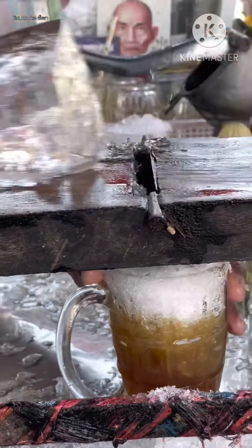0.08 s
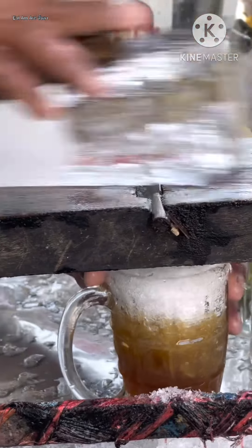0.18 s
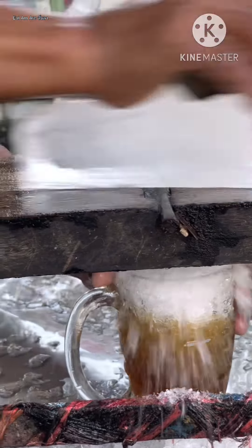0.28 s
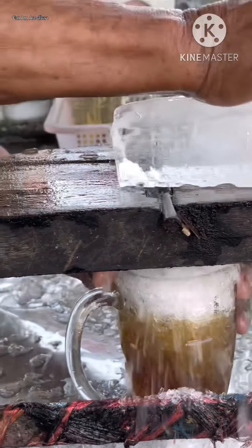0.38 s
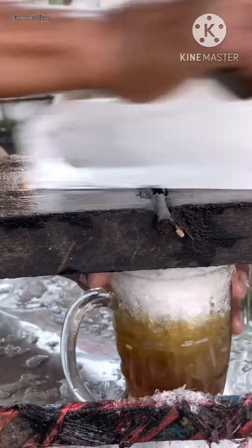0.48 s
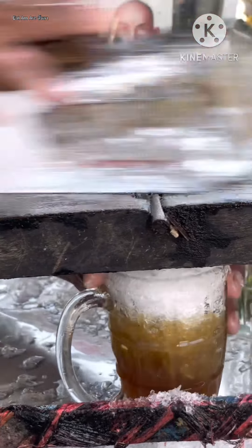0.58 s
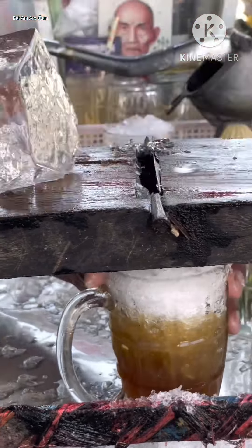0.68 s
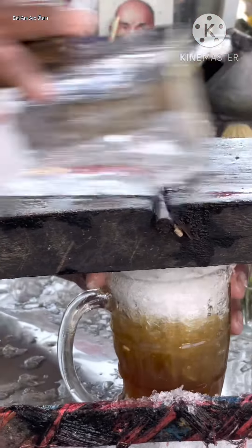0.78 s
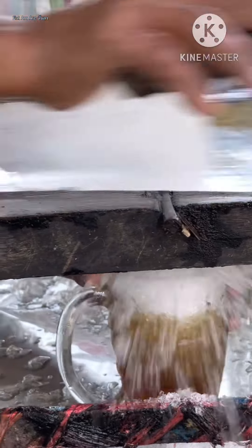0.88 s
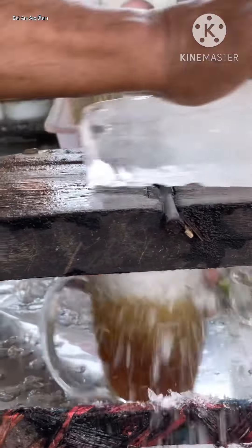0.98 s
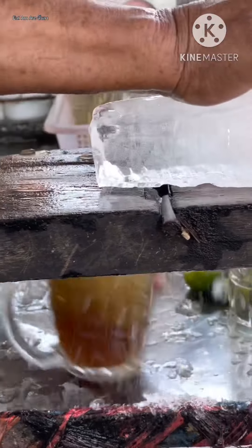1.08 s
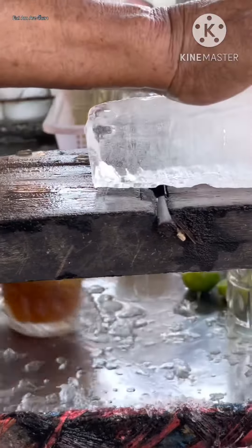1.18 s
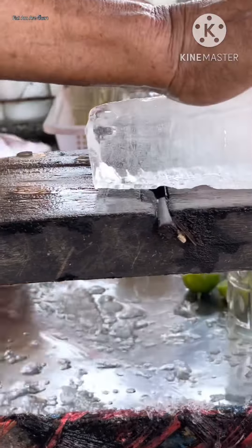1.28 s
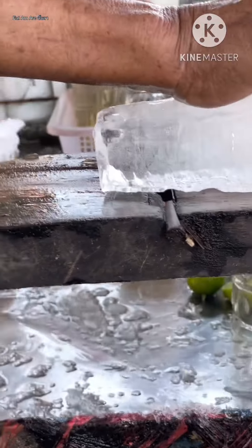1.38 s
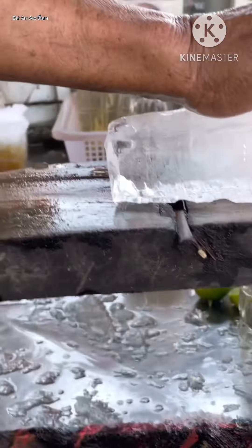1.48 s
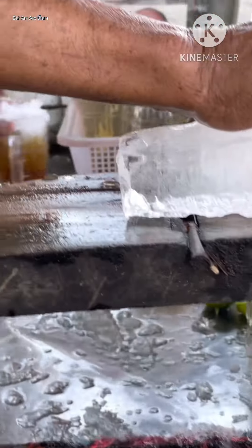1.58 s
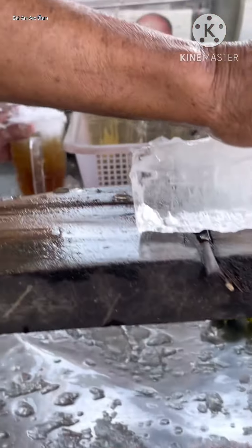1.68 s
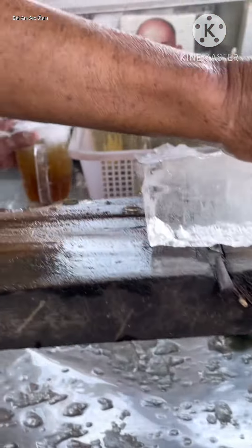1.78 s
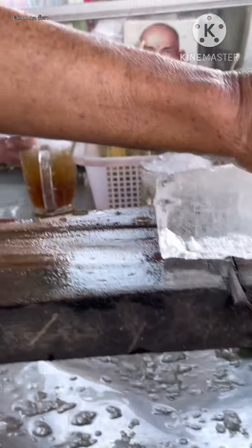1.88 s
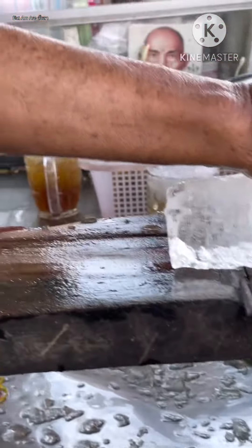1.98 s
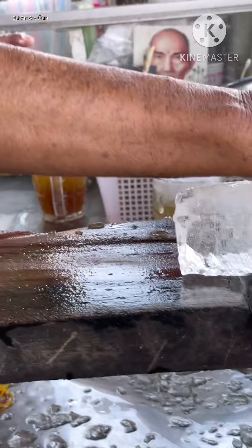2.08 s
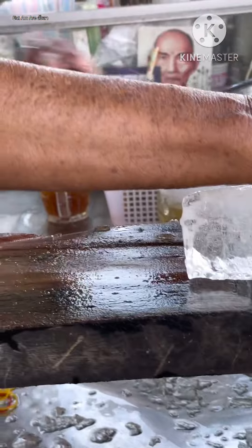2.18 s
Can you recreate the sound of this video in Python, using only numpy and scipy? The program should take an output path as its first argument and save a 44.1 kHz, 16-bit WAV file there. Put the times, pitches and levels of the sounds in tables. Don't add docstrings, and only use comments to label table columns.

```python
import sys
import numpy as np
from scipy import signal
from scipy.fft import rfft, irfft
from scipy.io import wavfile
from scipy.ndimage import uniform_filter1d

SR = 44100
rng = np.random.default_rng(int(sys.argv[2]) if len(sys.argv) > 2 else 0)


def to_linear_factor(level_db):
    exponent = np.asarray(level_db, float) / 20
    return 10 ** exponent


def int16_out(signal):
    q = np.round(np.clip(np.atleast_2d(signal).T, -1, 1) * 32767)
    wavfile.write(sys.argv[1], SR, q.astype(np.int16))


N = 97020
T = np.arange(N) / SR


def level(x, db=0):
    return x * to_linear_factor(db) / np.sqrt(np.mean(x ** 2))


def colour(x, points):
    hz, db = np.array(points).T
    f = np.maximum(np.fft.rfftfreq(N, 1 / SR), 1)
    return irfft(rfft(x) * to_linear_factor(np.interp(np.log(f), np.log(hz), db)), N)


def ring(x, hz, width_hz):
    b, a = signal.iirpeak(min(hz, .45 * SR), hz / width_hz, SR)
    return signal.lfilter(b, a, x)


def walk(rate):
    hold = int(SR / rate)
    steps = np.repeat(rng.standard_normal(N // 40), hold)[:N]
    return level(uniform_filter1d(steps, hold))


def curve(rows, col=1):
    rows = np.array(rows)
    return to_linear_factor(np.interp(T, rows[:, 0], rows[:, col], -120, -120))


def grains(rate, spread_db):
    chance, side, size = rng.random((3, N))
    sign = np.sign(side - .5)
    return (chance < rate / SR) * sign * to_linear_factor(-spread_db * np.log(size + 1e-3))


def echo(x, t60, db):
    fade = np.exp(-np.log(1000) * T[:16000] / t60)
    tail = level(rng.standard_normal(16000) * fade) / np.sqrt(16000)
    return x + to_linear_factor(db) * signal.fftconvolve(x, tail)[:N]


def hits(table, width, crack_db, gain_db, crack_hz):
    strike_share = 0.75
    out, t = np.zeros(N + 8000), np.arange(8000) / SR
    noises = rng.standard_normal((len(table), 8000))
    for (s, db, hz, t60), noise in zip(table, noises):
        fade = np.exp(-np.log(1000) * t / max(t60, .005))
        strike = strike_share + np.exp(-t / 0.0012)
        burst = noise * fade * strike * np.minimum(t / 0.0009, 1)
        width_hz = 1.93 * hz * width
        tone = ring(ring(burst, hz, width_hz), hz, width_hz)
        crack = ring(burst, crack_hz, 2.5 * crack_hz)
        hit = tone / abs(tone).max() + to_linear_factor(crack_db) * crack / abs(crack).max()
        i = int(s * SR)
        out[i:i + 8000] += to_linear_factor(db + gain_db) * hit
    return out[:N]


# (f/Hz, level/dB)
ICE_COLOUR = [(200, -6.5), (900, -7), (2500, -4), (7000, -1), (10000, 3), (12500, -5), (14800, 6),
              (16000, -9)]


def icy(x):
    return colour(x, ICE_COLOUR)


# (f/Hz, width/Hz, level/dB)
BOARD_MODES = [(513, 100, 2), (1000, 110, 4), (1437, 150, 5), (2320, 350, -4.5), (2900, 620, 1),
               (4300, 180, 2.5), (5900, 720, 1), (7220, 610, 1)]


def board(x, patchy_db=0):
    return x + sum(to_linear_factor(db + patchy_db * walk(54.0)) * ring(x, hz, w) for hz, w, db in BOARD_MODES)


# (t/s, level/dB)
STROKES = [
    [(0.241, -33.5), (0.247, -22.5), (0.277, -21.5), (.3, -23), (.33, -24), (.39, -22.5), (0.471, -31),
     (0.495, -60), (0.51, -60)],
    [(0.871, -26), (.897, -25), (0.921, -20.5), (.941, -28.5), (.98, -26), (1.037, -31), (1.07, -37.5),
     (1.125, -51), (1.145, -74)],
]
# (t/s, boost/dB)
BITES = [(0.246, 4.5), (.26, 6), (.267, 4.5), (0.275, 4), (0.281, 6.5), (.291, 7), (0.31, 10.5),
         (0.315, 1.5), (0.322, 3), (.336, 2.5), (0.351, -5.5), (.378, -1), (0.383, -2), (.417, 5.5),
         (.437, 3), (0.471, 2.5), (.872, 11), (.885, 6.5), (.889, 6), (0.895, 5), (.901, 7), (0.913, 3),
         (0.929, 11), (.948, 13), (0.962, 7.5), (0.97, 3.5), (0.98, 9.5), (.982, 1), (.988, 3), (1.003, 6),
         (1.012, 4.5), (1.028, 6), (1.036, 8.5), (1.051, 14), (1.064, 5.5), (1.073, 3.5), (1.099, 7),
         (1.117, 8)]
# (t/s, f/Hz, half length/s, level/dB)
FLARES = [(0.278, 6250, 0.012, 0.5), (0.302, 2740, 0.033, 0.5), (0.334, 1630, 0.039, 8.5),
          (0.383, 5900, 0.014, 5.5), (0.407, 2050, 0.063, 5), (0.896, 4300, 0.014, 6.5),
          (0.899, 6900, 0.012, 7), (0.909, 3100, 0.0042, 2), (0.991, 1390, 0.023, 8),
          (0.973, 4500, 0.011, 9), (1.042, 3170, 0.06, 8.5), (1.118, 3000, .014, 12)]


def cutting():
    chips_per_s, chip_spread_db = 16000, 2.2
    judder_hz, judder_db = 160, 1.
    bite_s, slip_s = 0.0018, 0.004
    digs = 0
    for s, db in BITES:
        pace_s = np.where(T < s + bite_s, bite_s, slip_s)
        digs = digs + db * np.exp(-abs(T - s - bite_s) / pace_s)
    bite = to_linear_factor(judder_db * walk(judder_hz) + digs)
    ice = icy(grains(chips_per_s, chip_spread_db))
    flares = 0
    for s, hz, half_s, db in FLARES:
        swell = np.exp(-((T - s) / half_s) ** 2)
        flares = flares + to_linear_factor(db + 1.5) * swell * ring(ice, hz, hz * .14)
    chips = level(board(ice, patchy_db=0.5) + flares, 1.1)
    return chips * bite * sum(curve(c) for c in STROKES)


# (t/s, level/dB, dullness/dB)
DRAGS = [
    [(0.0, -37, -5), (.018, -68, 13.5), (.026, -37.5, -7), (.055, -41, -9), (0.08, -35.5, -15),
     (0.11, -51.5, 2), (0.128, -36, -10), (.155, -58.5, 9.5), (0.2, -92, -5)],
    [(0.54, -60, -14), (.575, -58, -12), (0.61, -59.5, 13), (0.66, -76.5, 23), (.7, -49, -1.5),
     (0.73, -34, -15.5), (0.746, -57, 15), (.765, -74, 7), (0.79, -94, -3)],
    [(1.29, -88, -6), (1.306, -72, -21), (1.33, -52, -14), (1.354, -51, 9.5), (1.38, -68.5, 4),
     (1.4, -62, 14), (1.44, -84, -7), (1.465, -67, 7), (1.5, -72, -19)],
]


def dragging():
    grit = grains(16000, 0.67) * to_linear_factor(0.68 * walk(110))
    hiss = level(board(icy(grit), patchy_db=4), 1.5)
    rub = level(ring(board(grit), 800, 1000), .1)
    return sum(curve(d) * (hiss + curve(d, 2) * rub) for d in DRAGS)


# (t/s, level/dB)
CRUMBS = [(0.0, -70), (.17, -82), (0.23, -42), (.5, -46.5), (.68, -60), (.78, -95), (.85, -49.5),
          (1.14, -49.5), (1.23, -51.5), (1.285, -74), (1.35, -56), (1.55, -56.5), (1.72, -64), (1.89, -80),
          (2.2, -71)]


def crumbs():
    patter = grains(9000, 2.5) * to_linear_factor(1.8 * walk(40))
    dulling = to_linear_factor(np.interp(T, [1.5, 1.9], [-3, -16]))
    sparkle = level(ring(patter, 21000, 4000)) * dulling
    rattle = level(ring(patter, 5900, 7000))
    thud = level(ring(patter, 1200, 1500), 1.0)
    return (rattle + sparkle + thud) * to_linear_factor(-9.5) * curve(CRUMBS)


# (t/s, peak level/dB, f/Hz, ring/s)
KNOCKS = [(0.025, -28.5, 1400, 0.07), (0.127, -30.5, 2400, 0.14), (.134, -35, 560, .08),
          (0.572, -40.5, 1690, 0.091), (.62, -32, 1855, .05), (.58, -35.5, 940, .05),
          (0.599, -34, 1500, 0.05), (.612, -34, 1100, .08), (.641, -38, 1350, .08), (1.168, -34, 558, .06),
          (.712, -33.5, 970, .05), (0.729, -28, 1500, 0.06), (.738, -37, 480, 0.1),
          (.75, -37.5, 410, 0.059), (.873, -20, 1200, .03), (1.089, -34.5, 1330, 0.08),
          (1.166, -30, 1350, 0.06), (1.197, -48, 942, 0.051), (1.241, -47.5, 1500, .03),
          (1.324, -31, 1170, 0.04), (1.334, -35, 2500, .04), (1.338, -37, 1340, 0.03),
          (1.352, -34.5, 1000, 0.04), (1.396, -39.5, 1100, 0.04), (1.402, -36.5, 1200, .03),
          (1.414, -39.5, 2600, 0.05), (1.459, -46.5, 2440, 0.08), (1.467, -45.5, 2600, .05),
          (1.637, -33.5, 1150, 0.09)]


def knocks():
    body_hz, body_width_hz, body_db = 570, 420, -13.5
    blows = hits(KNOCKS, 0.36, -27.5, .1, 2200)
    body = level(ring(ring(blows, body_hz, body_width_hz), body_hz, body_width_hz))
    return blows + to_linear_factor(body_db) * body * np.std(blows)


# (t/s, peak level/dB, f/Hz, ring/s)
TICKS = [(0.1885, -45, 12000, 0.0087), (0.611, -26, 14900, 0.019), (0.635, -41, 7000, 0.04),
         (0.6833, -28, 6300, 0.031), (0.6944, -43.5, 5600, 0.012), (0.7986, -47, 15600, 0.02),
         (0.8365, -43, 14600, 0.031), (1.1518, -36, 15000, 0.039), (1.268, -42, 14500, 0.0088),
         (1.3084, -30, 14100, 0.016), (1.4531, -30.5, 14000, 0.025), (1.4835, -39, 14400, 0.028),
         (1.5529, -40.5, 15200, 0.051), (1.5664, -41.5, 13850, 0.038), (1.6661, -48.5, 14100, 0.022),
         (1.8113, -54, 15520, 0.012), (1.957, -49.5, 6300, 0.025), (2.1914, -49, 15700, 0.033)]


def ticks():
    return hits(TICKS, 0.54, -9.5, .1, 9000)


# (t/s, peak level/dB, f/Hz, ring/s)
DRIPS = [(.637, -37.5, 6000, 0.051), (.683, -36, 5800, .04), (.712, -35, 5900, 0.1),
         (1.098, -33.5, 3180, 0.031), (1.27, -45.5, 2550, 0.04), (1.3079, -38.5, 2200, 0.07),
         (1.3558, -35.5, 2100, 0.021), (1.3965, -40, 2194, 0.077), (1.7599, -67, 2265, 0.057),
         (1.7848, -51.5, 2410, 0.043), (1.92, -49.5, 2270, 0.04), (2.1116, -46.5, 2240, 0.076)]


def drips():
    return hits(DRIPS, 0.17, -5.5, 0.085, 3400)


def squeak():
    middle_hz, rise_hz_per_s = 5900, 37000
    t = T - 1.735
    tone = np.sin(2 * np.pi * (middle_hz * t + rise_hz_per_s * t ** 2 / 2))
    return to_linear_factor(-66 + 3 * walk(400)) * tone * np.exp(-(t / .016) ** 2)


# (t/s, level/dB)
ENGINE_LEVEL = [(0, -48), (.15, -45.5), (.3, -49), (.45, -44.5), (.55, -40.5), (.63, -47.5), (.75, -39.5),
                (.9, -40.5), (1.05, -39), (1.2, -41), (1.3, -42.5), (1.45, -39), (1.6, -39), (1.75, -39),
                (1.9, -38.5), (2.05, -37), (2.2, -33)]
# (f/Hz, width/Hz, level/dB)
EXHAUST = [(169.5, 66, -0.5), (156.64, 27, -7.5), (317, 59, -15.5), (463, 52, -25.5)]
# (t/s, firings so far)
FIRINGS = [(-.014, 0), (.429, 11), (.859, 22), (1.089, 28), (1.47, 38), (1.846, 48), (2.177, 57),
           (2.25, 59)]


def engine():
    lag_s, jitter_s, uneven_db = .012, .0003, 1.
    echo_t60_s, far_wet_db, near_wet_db = .25, -7, -20
    s, count = np.array(FIRINGS).T
    chance = rng.standard_normal((60, 2))
    at = np.interp(np.arange(60), count, s) - lag_s + jitter_s * chance[:, 0]
    pulses = np.zeros(N + SR)
    pulses[np.clip(at * SR, 0, None).astype(int)] = to_linear_factor(uneven_db * chance[:, 1])
    pipe = 0
    for hz, w, db in EXHAUST:
        pipe = pipe + to_linear_factor(db) * level(ring(ring(ring(pulses[:N], hz, w), hz, w), hz, w))
    wet = to_linear_factor(np.interp(T, [0, T[-1]], [far_wet_db, near_wet_db]))
    tail = echo(pipe, echo_t60_s, 0) - pipe
    return level(pipe + wet * tail) * curve(ENGINE_LEVEL)


# (t/s, level/dB)
SHAKE = [(0, -49.5), (.5, -46), (.9, -49), (1.1, -48), (2.2, -62.5)]


def shake():
    push = np.diff(rng.standard_normal(N), prepend=0)
    rumble = ring(ring(push, 43, 70), 65, 110)
    return level(rumble * to_linear_factor(1.2 * walk(25))) * curve(SHAKE)


# (f/Hz, level/dB)
STREET = [(30, -33.5), (60, -7.5), (120, -0.5), (300, 1), (600, -20.5), (1000, -30.5), (3000, -36),
          (16000, -79.5)]


def street():
    return level(colour(rng.standard_normal(N), STREET) * to_linear_factor(1.2 * walk(6)), -49)


# (start t/s, end t/s)
KEPT = [(.11, .15), (.24, .256), (.68, .69), (.868, .88), (.92, .96), (1.04, 1.08), (1.305, 1.32),
        (1.45, 1.5), (1.63, 1.68)]


def stereo_part(spec, share):
    kept = uniform_filter1d(sum((T > a) & (T < b) for a, b in KEPT) * 1., size=200)
    edge = np.maximum(kept, uniform_filter1d((walk(18) > .5) * 1., size=400))

    def under(limit):
        weak = uniform_filter1d((abs(share) < limit) * 1., size=300)
        return uniform_filter1d(weak, size=300)

    def part(weight):
        return irfft(spec * share * weight, N)

    core, wide = under(.27), under(.4)
    return part(1 - wide) + edge * part(wide - core) + kept * 0.092 * irfft(spec * core, N)


# (f/Hz, phase/rad)
PORT_PHASE = [(100, .06), (3900, .3), (4800, 1.5), (5450, .25), (7100, 1.57), (10050, 3.14), (14000, 5.4),
              (15300, 6.28)]


def scene():
    near = cutting() + dragging() + crumbs() + knocks() + ticks() + drips() + squeak()
    near = echo(near, 0.051, -12)
    spec = rfft(near + engine() + street() + shake())
    hz, rad = np.array(PORT_PHASE).T
    lead = np.interp(np.fft.rfftfreq(N, 1 / SR), hz, rad)
    half = uniform_filter1d(lead, size=500) / 2
    mid = stereo_part(spec, np.cos(half))
    side = stereo_part(1j * spec, np.sin(half))
    side = side + to_linear_factor(-13) * street() + to_linear_factor(-15) * ring(ring(near, 480, 500), 480, 500)
    tilt = to_linear_factor(.1 / 2)
    return np.array([(mid + side) * tilt, (mid - side) / tilt])


def low_pass(x):
    return signal.sosfilt(signal.butter(12, 16990, fs=SR, output="sos"), x)


def record(dry):
    low_cut = signal.butter(2, 35, "high", fs=SR, output="sos")
    top_cut = signal.ellip(8, .2, 60, 15900, fs=SR, output="sos")
    clear = signal.sosfilt(low_cut, dry * np.minimum(T / .004, 1))
    limited = np.tanh(1.277 * clear) / 1.251
    return low_pass(signal.sosfilt(top_cut, limited))


dry = scene()
out = record(dry)
int16_out(out)
```